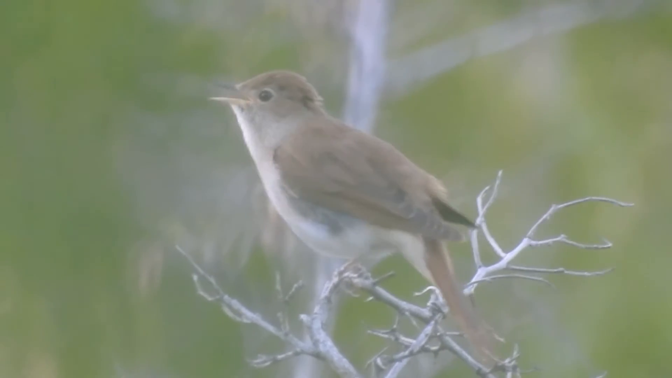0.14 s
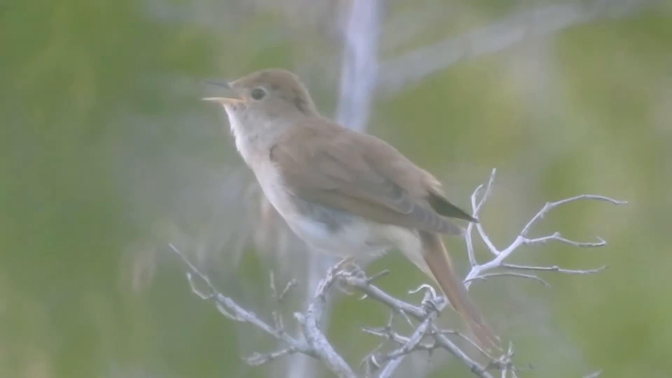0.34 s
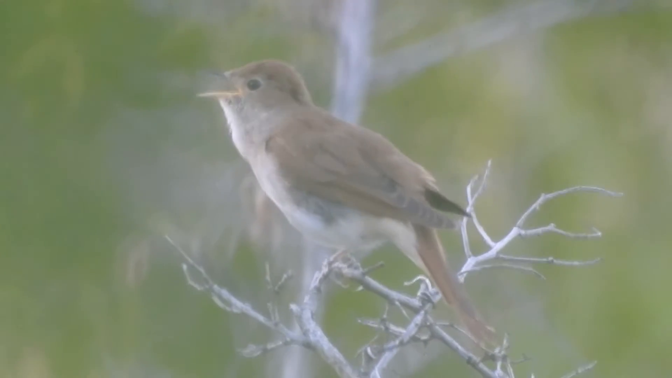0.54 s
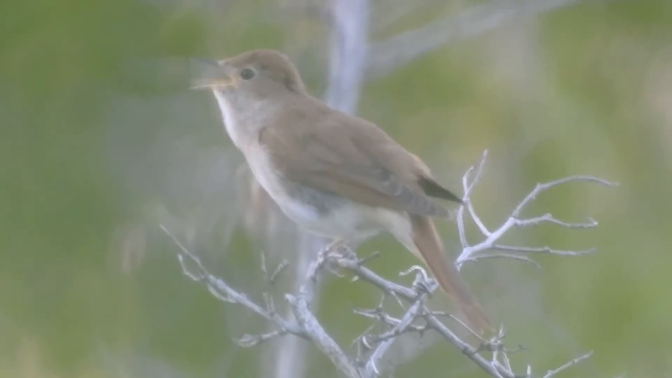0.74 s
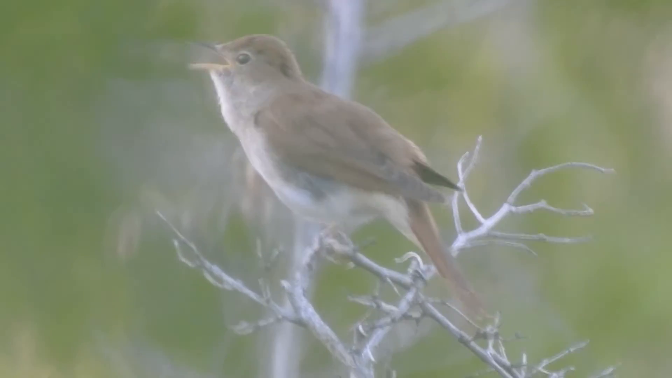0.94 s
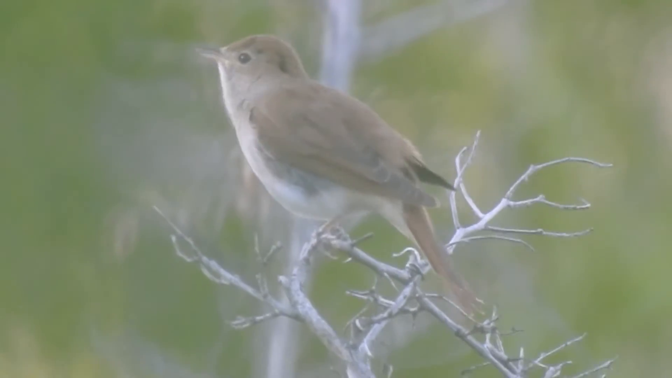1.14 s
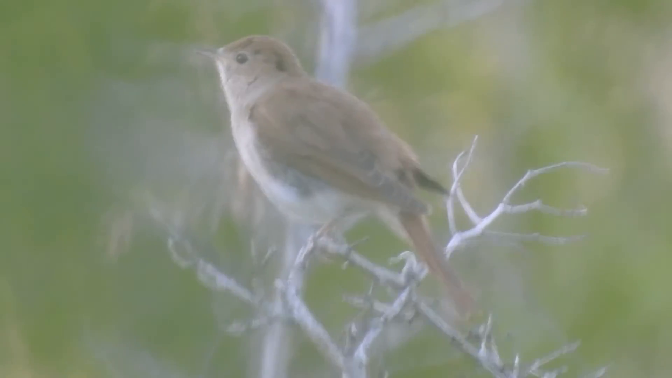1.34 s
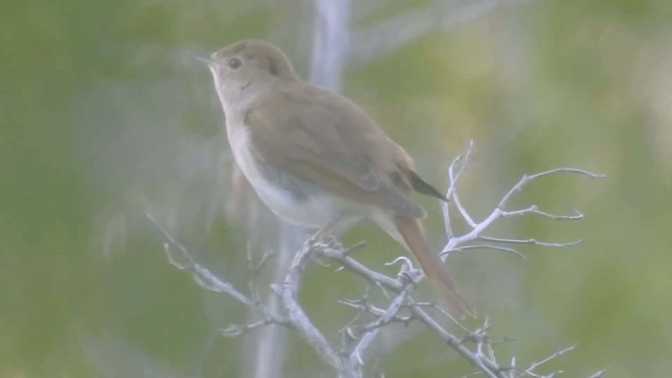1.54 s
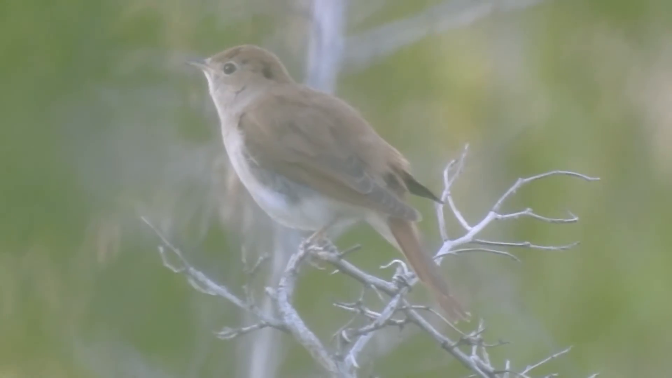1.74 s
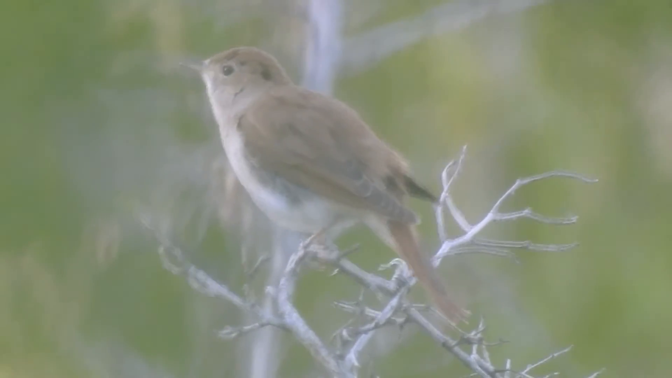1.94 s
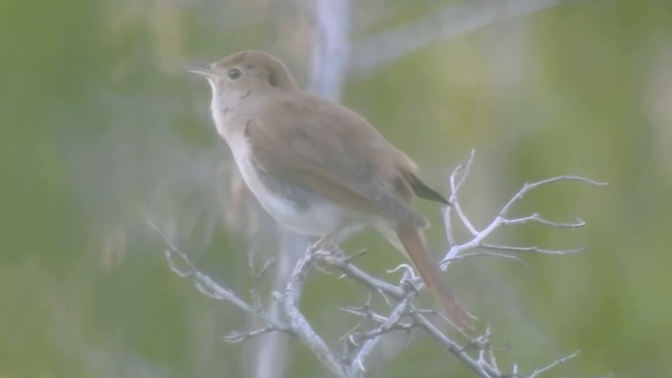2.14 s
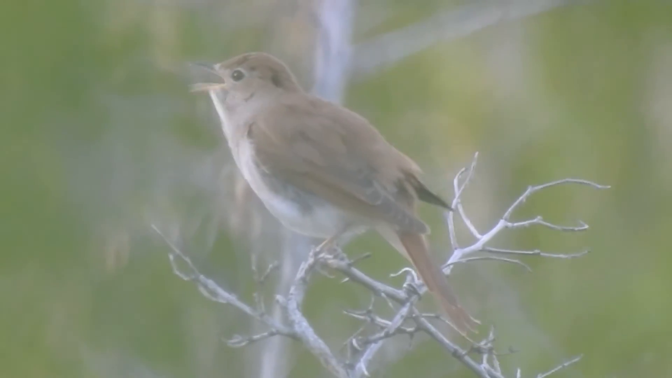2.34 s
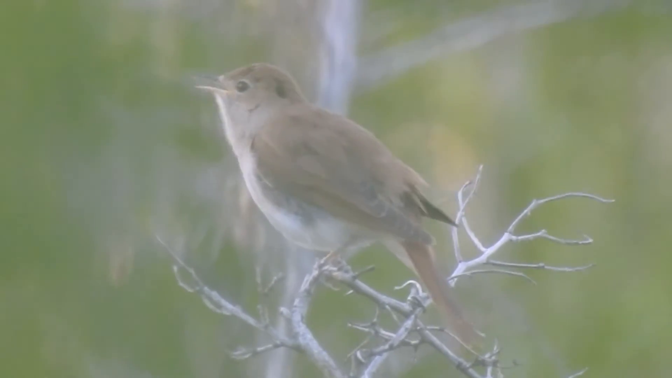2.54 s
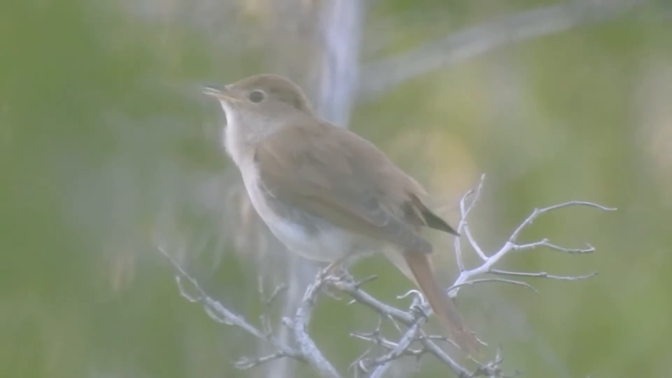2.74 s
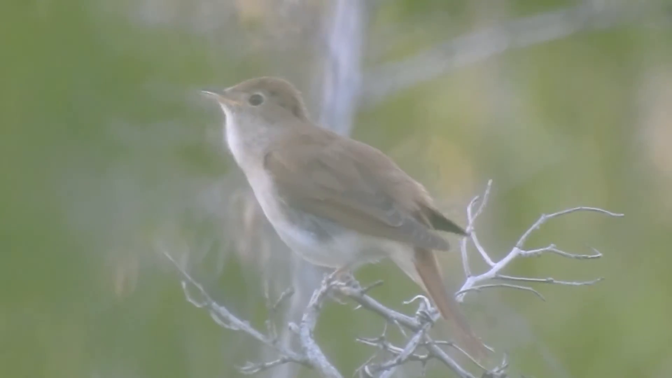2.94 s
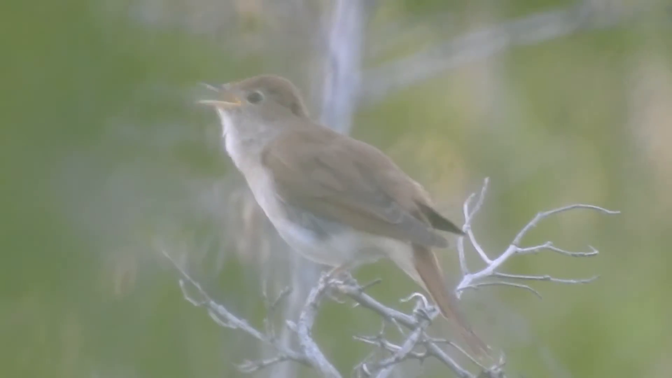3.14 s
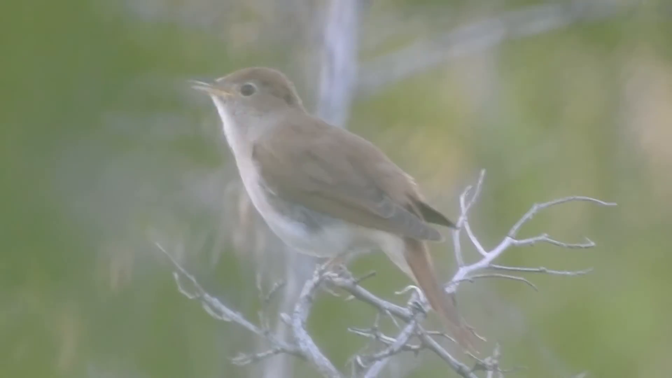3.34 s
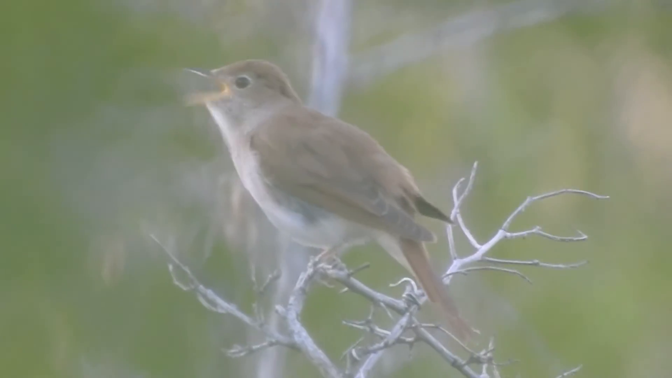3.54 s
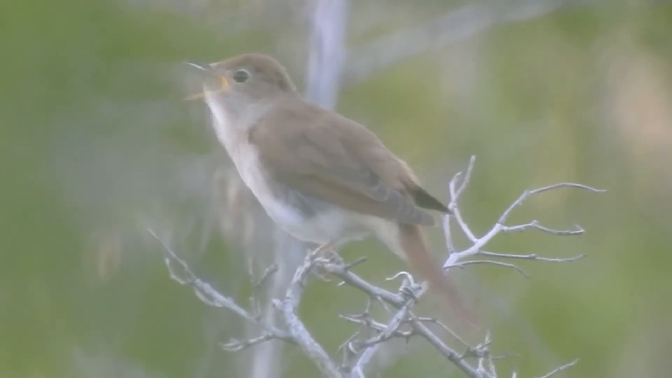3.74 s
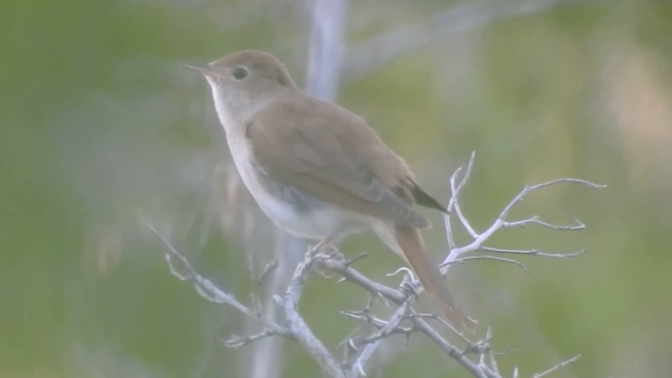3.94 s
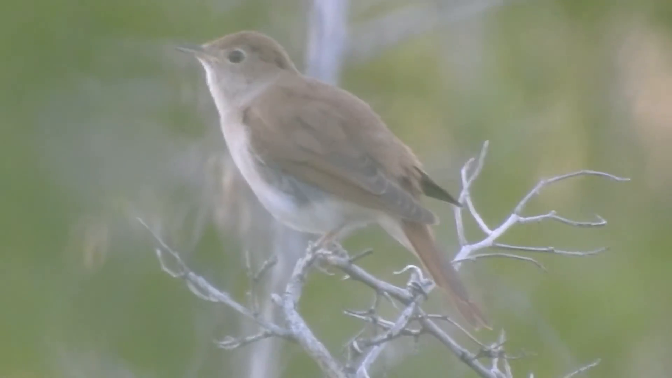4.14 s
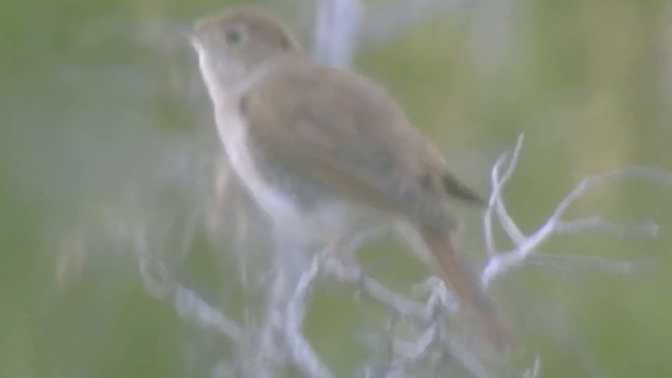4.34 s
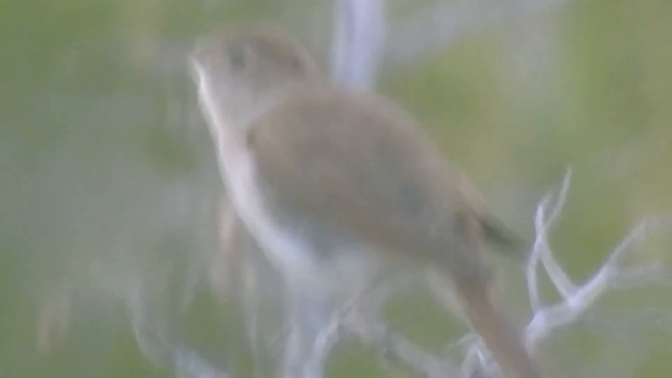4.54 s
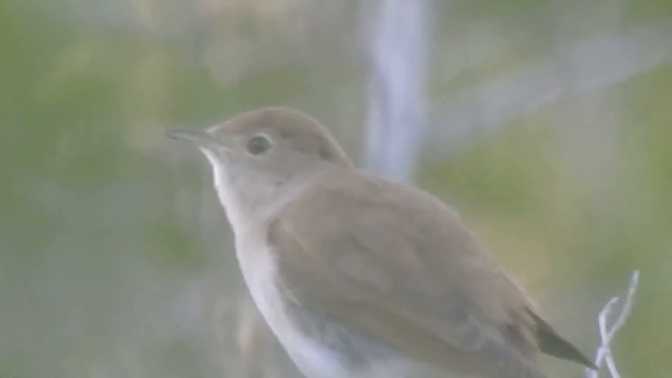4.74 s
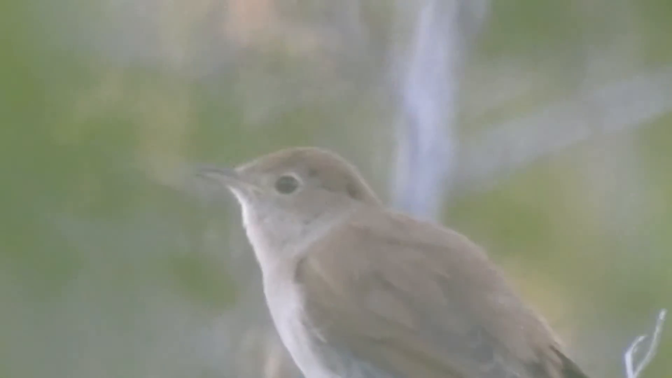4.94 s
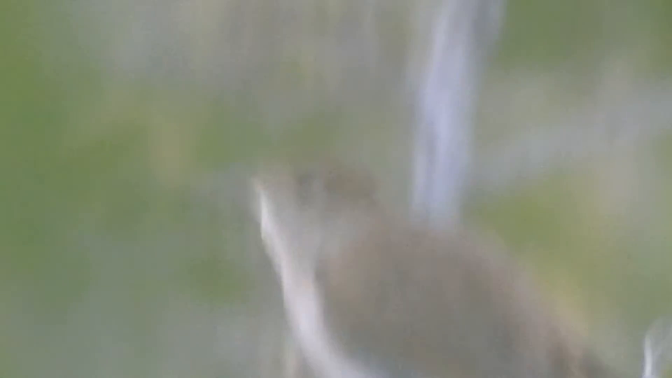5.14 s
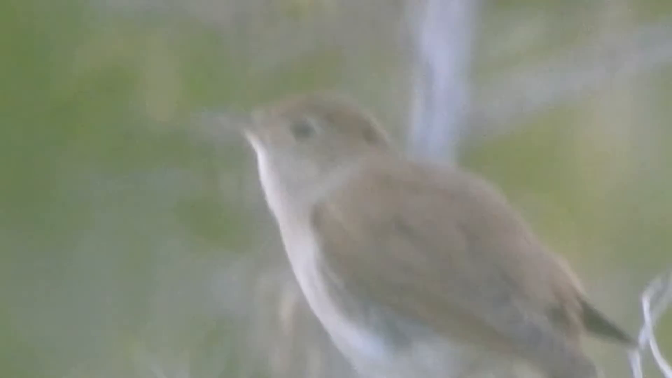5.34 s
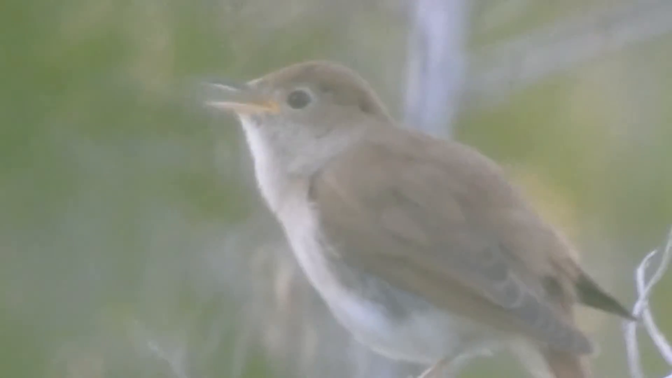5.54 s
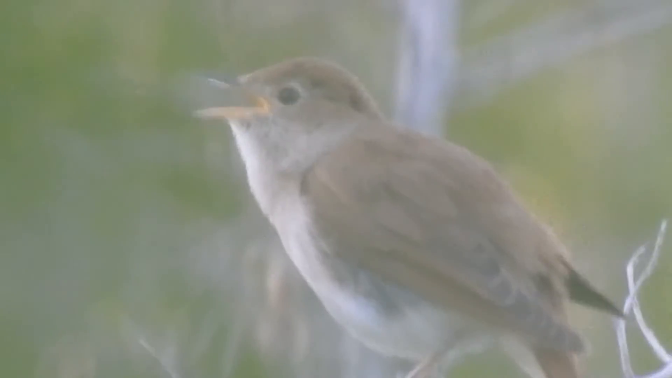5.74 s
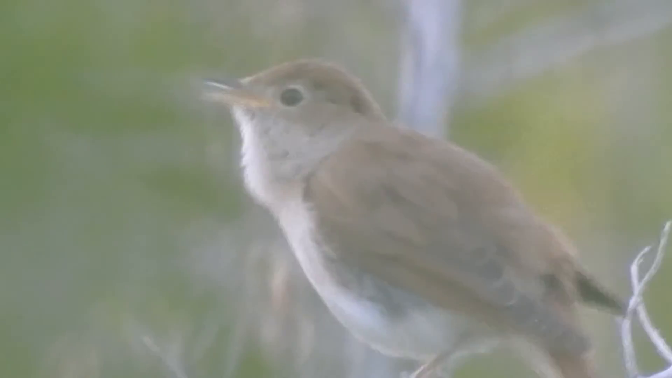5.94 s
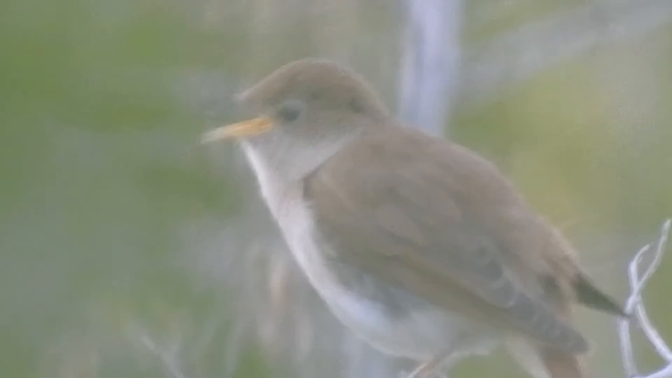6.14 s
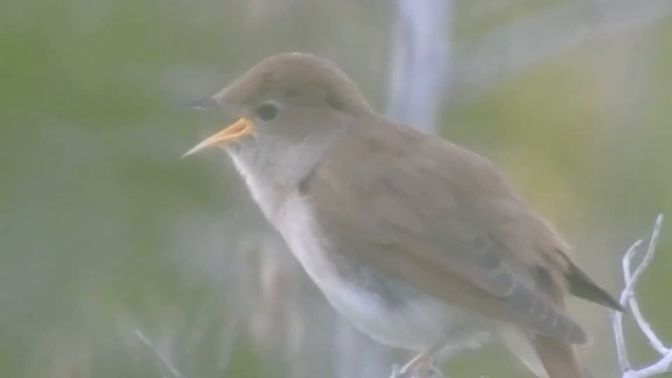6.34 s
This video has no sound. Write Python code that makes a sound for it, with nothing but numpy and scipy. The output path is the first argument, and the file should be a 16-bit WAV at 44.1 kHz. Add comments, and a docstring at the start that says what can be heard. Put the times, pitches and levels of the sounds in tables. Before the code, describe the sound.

A nightingale close by sings rapid clicks, whip-like cracks, short trills and gliding chirps outdoors, with crickets pulsing and fainter birds answering farther off.

```python
"""Among bushes, outdoors: a nightingale sings a few metres off in clicks, whips, trills and gliding whistles.
Its voice, and that of the other birds farther away, is a nearly pure tone steered in pitch and level.
Crickets to the right are pulsed falling tones; clicks are resonant noise bursts.
Shaped noise makes the soft rumble and leaf hiss, and decaying noise the short, scattered echo of the bushes."""
import sys
import numpy as np
from scipy import signal
from scipy.fft import rfft, irfft, next_fast_len
from scipy.io import wavfile
from scipy.ndimage import uniform_filter1d, map_coordinates

SR = 44100
rng = np.random.default_rng(int(sys.argv[2]) if len(sys.argv) > 2 else 0)


def persist_wave(psi):
    """Save psi, clipped to +-1, as 16-bit WAV."""
    counts = np.round(np.clip(psi, -1, 1) * 32767).astype(np.int16)
    wavfile.write(sys.argv[1], SR, np.atleast_2d(counts).T)


def ratio_of_db(decibels):
    """Turn decibels (scalar or array-like) into linear amplitude factors; 0 dB maps to 1."""
    return 10 ** (np.asarray(decibels, float) / 20)


N = 285768  # samples in the scene


def unit(x):
    """Normalisation: a signal divided by its root mean square has rms 1."""
    return x / np.sqrt(np.mean(x ** 2) + 1e-20)


def along(points, hz):
    """Logarithmic interpolation: (f/Hz, value) points joined on a log frequency axis."""
    f, v = np.transpose(points)
    return np.interp(np.log(hz + 1), np.log(f + 1), v)


def wobble(size, rate):
    """Band-limited fluctuation: a smooth curve through random knots, rate of them a second."""
    knots = rng.standard_normal(int(size * rate / SR) + 4)
    return map_coordinates(knots, [np.arange(size) * rate / SR])


def filtered(x, response):
    """Linear filtering: the spectrum times a complex response of frequency."""
    m = next_fast_len(x.shape[-1] + 8192)
    spectrum = rfft(x, m) * response(np.fft.rfftfreq(m, 1 / SR))
    return irfft(spectrum, m)[..., :x.shape[-1]]


def add(track, s, sound):
    """Superposition: a sound is summed into a track from time s."""
    part = track[round(s * SR):][:len(sound)]
    part += sound[:len(part)]


TRAIL = int(.01 * SR)  # samples by which the overtones lag the fundamental


def syrinx(hz, gain):
    """Filtered vibration: beak and throat leave faint overtones, and the membrane shivers a little."""
    brief = 1 / (1 + len(hz) / SR / 0.46)  # held whistles are steadier than quick notes
    shivering_hz = hz * (1 + 0.0081 * brief * wobble(len(hz), 290.5))
    phase = 2 * np.pi * (np.cumsum(shivering_hz) / SR + rng.random())
    overtones = ratio_of_db(-18.5) * np.sin(2 * phase) + ratio_of_db(-37.0) * np.sin(3 * phase)
    # overtones pass best where the open beak favours them: fundamentals near 3100 Hz
    fits = .015 + np.exp(-((hz - 3100) / 500) ** 2)
    size = gain * ratio_of_db(2.0 * brief * wobble(len(hz), 140.0))
    fundamental = np.pad(size * np.sin(phase), (0, TRAIL))
    return fundamental + np.pad(size * brief * fits * overtones, (TRAIL, 0))


def note(ms, first_hz, mid_hz, last_hz, db, swell, lean=0.78):
    """Frequency modulation: a parabola of pitch under one arch of level; lean below 1 peaks it early."""
    u = np.linspace(0, 1, int(ms * SR / 1000) + 2)
    bend = np.polyfit([0, .5, 1], [first_hz, mid_hz, last_hz], deg=2)
    return syrinx(np.polyval(bend, u), ratio_of_db(db) * np.abs(np.sin(np.pi * u ** lean)) ** swell)


def glide(rows, soften_ms):
    """Portamento: a (t/s, f/Hz, level/dB) contour with its pitch corners rounded and its ends faded."""
    s, hz, db = np.transpose(rows)
    t = np.arange(s[0], s[-1], 1 / SR)
    width = int(soften_ms * SR / 1000) + 1
    pitch = uniform_filter1d(np.interp(t, s, hz), width, mode="nearest")
    ends = np.clip(np.minimum(t - s[0], s[-1] - t) / 0.0012, 0, 1)  # 1.2 ms fades
    return syrinx(pitch, ends * np.interp(t, s, ratio_of_db(db)))


def bird(notes, glides, swell, soften_ms):
    """Superposition: short notes and long contours make up one song."""
    song = np.zeros(N)
    for s, *shape in notes:
        add(song, s, note(*shape, swell))
    for rows in glides:
        add(song, rows[0][0], glide(rows, soften_ms))
    return song


def bowed(rows):
    """Curved frequency sweep: pitch bows above the straight line, so rises ease off and falls speed up."""
    bow = 0.169  # share of the slide's span
    return [(s, ms, a, (a + b) / 2 + bow * abs(b - a), b, db) for s, ms, a, b, db in rows]


# relative spectral density of the air: f/Hz, level/dB per Hz
AIR_SPECTRUM = [(25, -32), (45, -3.5), (70, 4), (130, -4.5), (200, 0.5), (520, -9), (650, -5), (730, -11.5),
                (1700, -16), (3600, -17.5), (6300, -15), (8100, -28), (14000, -38.5), (15600, -45)]
# correlation of left and right in the air: f/Hz, likeness (0 to 1)
AIR_LIKENESS = [(60, 0.82), (950, 0.92), (3770, 0.47), (15000, 0.062)]


def air():
    """Shaped noise with partial coherence: distant rumble and leaf hiss with faint patches."""
    z = signal.stft(rng.standard_normal((2, N)), nperseg=512)[2]
    field = uniform_filter1d(rng.standard_normal(z.shape[1:]), size=6, axis=0)
    patches = unit(uniform_filter1d(field, size=14, axis=1))
    leafy = np.clip(np.arange(len(field))[:, None] / 20, 0, 1)  # the rumble stays even, the leaves rustle
    pair = signal.istft(z * ratio_of_db(2.37 * leafy * patches), nperseg=512)[1][:, :N]

    def mid_side(hz):
        angle = np.arccos(np.clip(along(AIR_LIKENESS, hz), -1, 1)) / 2
        return ratio_of_db(along(AIR_SPECTRUM, hz)) * [np.cos(angle), np.sin(angle)]

    mid, side = filtered(pair, mid_side)
    return ratio_of_db(-44.5) * unit(np.array([mid + side, mid - side])) * ratio_of_db([[-.9], [.9]])


# level of the farther crickets together: t/s, level/dB (rms)
CHORUS_LEVEL = [(0, -50), (1.4, -51.5), (2, -49), (2.25, -59.5), (3.3, -51.5), (4.7, -58.5), (6.48, -56.5)]


def crickets(count=10):
    """Stridulation: wing strokes are falling tones of some 22 ms; each insect has its own pace and pitch."""
    s, db = np.transpose(CHORUS_LEVEL)
    out = np.zeros((2, N))
    for k in range(count):
        cycle = (np.cumsum(19 + .4 * k + 1.4 * wobble(N, 3)) / SR + rng.random()) % 1
        stroke = np.clip(cycle / .45, 0, 1)
        hz = 4900 - 52 * k + 60 * wobble(N, 2.6) - 330 * stroke ** 2
        size = np.sin(np.pi * stroke) * ratio_of_db(4.4 * wobble(N, 5.03))
        tone = size * np.sin(2 * np.pi * np.cumsum(hz) / SR)
        out += [tone, ratio_of_db(5.0) * np.roll(tone, -1 - k % 3)]  # the right channel leads by 1 to 3 samples
    return unit(out) * ratio_of_db(np.interp(np.arange(N) / SR, s, db))


# reverberation time of the bushes: f/Hz, T60/s
BUSH_DECAY = [(1500, 0.62), (4000, 0.56), (8000, 0.35)]


def bushes(x, alike):
    """Diffuse reflection: decaying noise; a clump some 9 m away throws one stronger echo, 50 ms late."""
    hz, t, z = signal.stft(rng.standard_normal((3, SR // 2)), SR, nperseg=128)
    decay = ratio_of_db(-60 * t / along(BUSH_DECAY, hz)[:, None])
    common, *own = signal.istft(z * decay, SR, nperseg=128)[1]
    share = np.clip(alike, 0, 1)  # of the power common to both channels
    tail = np.sqrt(share) * common + np.sqrt(1 - share) * np.array(own)
    tail = tail / np.linalg.norm(tail[0])
    tail[:, SR // 20:][:, :SR // 200] += 0.029 * rng.standard_normal(SR // 200)  # the clump, 5 ms long
    return signal.fftconvolve(x[None], tail, axes=1)[:, :N]


# dry ticks of beak and twigs: t/s, level/dB (peak), centre f/Hz, time for the burst to fall 14 dB/ms
TICKS_HEARD = [(0.044, -22, 5460, 5.7), (0.0706, -17, 6200, 1.9), (.094, -16.5, 6140, 3.6),
               (0.121, -17, 6130, 4.4), (1.717, -31, 5400, 1.9), (3.806, -22.5, 5300, 2.3),
               (4.623, -32, 1040, 13), (4.635, -29, 5560, 6), (5.1, -34.5, 950, 9.7)]


def ticks(width):
    """Resonance: noise bursts of a few milliseconds are coloured by one broad peak, width over centre."""
    out, t = np.zeros(N), np.arange(SR // 20) / SR
    for s, db, hz, ms in TICKS_HEARD:

        def response(f):
            damping = 1j * f * width * hz
            peak = damping / (hz * hz - f * f + damping)
            return peak ** 3 / (1 + 1j * f / 8000) ** 6  # little gets out above 8 kHz

        burst = rng.standard_normal(len(t)) * ratio_of_db(-14 * t * 1000 / ms)
        ring = filtered(burst, response)
        add(out, s, ratio_of_db(db) * ring / np.abs(ring).max())
    return out


# two near crickets: strokes a chirp, gap/ms, first f/Hz, fall in f/Hz
NEAR_CRICKETS = [(4, 47, 4820, 420), (3, 45, 4440, 120)]
# chirps, one list a cricket: t/s of the last stroke, level/dB of that stroke before panning
CHIRP_TIMES = [
    [(.47, -41), (.96, -40), (1.46, -41.5), (1.98, -40.5), (2.43, -37), (2.93, -37.5), (3.49, -39),
     (3.96, -37), (4.42, -41), (4.93, -38.5), (5.32, -41), (6.4, -42)],
    [(.17, -34), (.68, -40), (1.4, -37), (2.07, -39.5), (2.56, -38.5), (3.81, -40), (4.25, -39.5),
     (5.0, -42.5), (5.53, -40.5)],
]


def chirps():
    """Stridulation: a chirp is a few falling wing strokes that tend to swell; the right channel leads."""
    stroke_ms, swell_db = 21.4, 2.5  # swell from one stroke to the next
    song, u = np.zeros(N), np.linspace(0, 1, int(stroke_ms * SR / 1000))
    for (strokes, gap_ms, hz, fall_hz), rows in zip(NEAR_CRICKETS, CHIRP_TIMES):
        for s, db in rows:
            for k in range(strokes):  # counted back from the last
                size, detune, turn = rng.standard_normal(3)
                phase = 2 * np.pi * np.cumsum(hz + 30 * detune - fall_hz * u) / SR + 2 * turn
                gain = ratio_of_db(db - swell_db * k + 2.0 * size)
                add(song, s - k * gap_ms / 1000, gain * np.sin(np.pi * u) * np.sin(phase))
    return np.array([ratio_of_db(-3) * song, ratio_of_db(2.0) * np.roll(song, -2)])


# sliding notes: start t/s, length/ms, first f/Hz, last f/Hz, level/dB
NEAR_SLIDES = [(1.217, 22, 6200, 7520, -22.5), (1.217, 44, 5300, 6190, -26), (1.204, 34, 3550, 4100, -41.5),
               (1.228, 42, 4080, 5480, -29), (1.214, 37, 2750, 3170, -38.5), (2.478, 10.4, 3820, 3650, -30),
               (2.486, 9.7, 5700, 3530, -25.5), (3.123, 8.4, 2860, 4220, -29),
               (3.131, 9.8, 3930, 6180, -19.5), (3.139, 8.3, 4220, 4340, -11), (3.41, 23, 3590, 4050, -28),
               (3.415, 11, 5020, 7050, -29), (3.42, 10, 4270, 5640, -26), (3.418, 28, 2914, 1410, -23.5),
               (3.872, 24, 3463, 1388, -21.5), (3.876, 9.7, 3880, 4650, -21.5)]
# arched notes: start t/s, length/ms, top f/Hz, level/dB
NEAR_ARCHES = [(2.903, 56, 1753, -30), (3.008, 65, 1743, -31.5), (0.165, 34, 4520, -29.5)]
# long notes, one contour each: t/s, f/Hz, level/dB
NEAR_CONTOURS = [
    [(0.18, 2350, -33), (0.19, 1985, -23.5), (0.201, 1832, -37), (0.213, 2110, -24), (0.227, 2540, -20.5),
     (0.24, 2710, -18), (0.251, 2765, -23)],
    [(2.395, 4245, -38.5), (2.44, 4680, -41.5), (2.47, 5100, -31), (2.486, 5580, -23.5)],
    [(3.135, 4180, -26), (3.139, 3630, -14.5), (3.144, 2950, -18.5), (3.156, 3270, -20),
     (3.167, 3400, -18.5), (3.178, 3030, -27), (3.193, 2060, -40)],
    [(3.256, 1734, -45), (3.266, 1957, -31.5), (3.271, 1930, -42), (3.276, 2170, -22.5), (3.288, 2306, -27),
     (3.305, 2700, -19.5), (3.316, 2830, -18), (3.328, 2680, -20.5), (3.344, 1750, -33.5)],
    [(3.645, 8550, -42), (3.65, 7980, -31), (3.665, 7160, -21), (3.68, 6650, -18), (3.688, 6300, -37.5)],
    [(3.742, 2320, -34), (3.76, 2510, -24.5), (3.77, 2410, -23.5), (3.775, 1790, -31), (3.784, 1723, -33.5),
     (3.803, 2910, -18.5), (3.812, 3095, -18.5), (3.822, 2990, -31)],
    [(3.981, 3600, -33), (3.987, 6260, -14), (3.992, 7770, -38), (3.998, 8400, -33)],
    [(5.59, 3170, -66), (5.66, 3358, -42), (5.72, 3386, -35), (5.9, 3430, -34), (5.95, 3483, -30.5),
     (5.96, 3420, -38)],
    [(6.2, 3560, -45), (6.23, 3560, -35), (6.3, 3505, -31.5), (6.38, 3445, -28), (6.49, 3567, -27)],
]


def near_notes():
    """Frequency modulation: the near bird's slides, arches and long contours."""
    start, end = .82, 0.722  # pitch at the ends of an arch, over its middle
    arches = [(s, ms, start * hz, hz, end * hz, db) for s, ms, hz, db in NEAR_ARCHES]
    return bird(bowed(NEAR_SLIDES) + arches, NEAR_CONTOURS, swell=0.56, soften_ms=1.5)


# whip-and-trill phrases: crack t/s, crack level/dB, wait before the trill/ms,
# trill first f/Hz, trill level/dB, fade a note/dB
WHIP_TRILLS = [(0.345, -7.5, 31, 3250, -17, 4), (0.5742, -10, 26, 3280, -17.5, 4.5),
               (0.7959, -12, 26, 3400, -16.5, 4.5), (1.0199, -10.5, 22.4, 3010, -24, 1.4)]
# the whip, as contours around its loudest moment: t/s from the crack, f/Hz, level/dB re crack
WHIP_CONTOURS = [
    [(-.010, 4200, -30), (-.0075, 3750, -11.5), (-.005, 3150, -12)],
    [(-.004, 7400, -42), (-.002, 6600, -11), (0, 5700, -1), (.002, 4700, -8), (.005, 3700, -15)],
    [(-.016, 13000, -62), (-.01, 13700, -43), (-.006, 13100, -31), (-.002, 11000, -30.5), (.002, 8000, -30)],
]
# the low hook under each crack: t/s from the crack, f/Hz, level/dB
WHIP_HOOK = [(0, 2800, -28), (.004, 2400, -26), (.011, 2370, -26.5), (.02, 2600, -36)]


def whips():
    """Two-voice phonation: a blip, steep loud fall and thin high arc; a low hook from the other syrinx half."""
    song = np.zeros(N)
    for s, db, *_ in WHIP_TRILLS:
        add(song, s, glide(WHIP_HOOK, soften_ms=1.63))
        for part in WHIP_CONTOURS:
            add(song, s + part[0][0], ratio_of_db(db) * glide(part, soften_ms=1.2))
    return song


# successive notes of every trill: length/ms
TRILL_LENGTHS = [14, 19, 24, 17.3]


def trills():
    """Exponential relaxation: notes open sharply, sag toward one low pitch, and fade one after another."""
    gap_ms, sag_ms, low_hz = 26.5, 8.36, 2192  # sag: time constant of the fall
    scatter, scatter_db = 0.029, 0.5  # scatter: share of the first pitch
    song = np.zeros(N)
    for s, _, wait_ms, hz, db, fade_db in WHIP_TRILLS:
        for k, ms in enumerate(TRILL_LENGTHS):
            u = np.linspace(0, 1, int(ms * SR / 1000))
            first_hz = hz * (1 + scatter * rng.uniform(-0.87, 1))
            pitch = low_hz + (first_hz - low_hz) * np.exp(-u * ms / sag_ms)
            size = ratio_of_db(db - fade_db * k + scatter_db * rng.standard_normal())
            envelope = np.abs(np.sin(np.pi * u ** 0.61)) ** 0.7
            add(song, s + (wait_ms + k * gap_ms) / 1000, syrinx(pitch, size * envelope))
    return song


# thin sliding whistles: start t/s, length/ms, first f/Hz, last f/Hz, level/dB
FAR_WHISTLES = [(0.675, 120, 6870, 6450, -43.5), (0.945, 72, 7340, 6280, -46.5),
                (3.404, 120, 7300, 6400, -46.5), (5.64, 210, 5120, 4845, -49),
                (5.89, 100, 2720, 2360, -41.5), (6.391, 90, 3100, 3120, -53), (5.7, 72, 2310, 2020, -48),
                (5.77, 150, 7030, 6140, -49), (5.915, 26, 5380, 4490, -41), (6.08, 35.6, 4620, 5040, -40.5),
                (6.14, 26, 6120, 6840, -42.5), (2.23, 150, 3123, 3066, -51.5), (6.25, 79, 1695, 1780, -52),
                (6.315, 33, 5000, 5330, -42.5)]
# falls that speed up: start t/s, length/ms, first f/Hz, last f/Hz, level/dB
FAR_FALLS = [(6.18, 46, 6640, 5730, -40), (6.342, 30, 5130, 4560, -39.5)]
# long notes, one contour each: t/s, f/Hz, level/dB
FAR_CONTOURS = [
    [(4.87, 2086, -65), (4.92, 2090, -39), (4.96, 2243, -35.5), (5.01, 2316, -37), (5.06, 2090, -38.5),
     (5.1, 1983, -45), (5.2, 2000, -68)],
    [(5.22, 2865, -44), (5.25, 2850, -44), (5.275, 2100, -42.5), (5.31, 1636, -45.5)],
    [(5.38, 2095, -46), (5.43, 2010, -39), (5.48, 2023, -34), (5.53, 2086, -41), (5.58, 2140, -64)],
]


def far_notes():
    """Frequency modulation: far birds' falls and contours, and thin whistles whose slide slows down."""
    early = 0.64  # share of the slide done by half time
    slides = [(s, ms, a, a + early * (b - a), b, db) for s, ms, a, b, db in FAR_WHISTLES]
    return bird(slides + bowed(FAR_FALLS), FAR_CONTOURS, swell=0.12, soften_ms=20)


# the chanted phrase: t/s from the top note, length/ms, first f/Hz, middle f/Hz, last f/Hz, level/dB before gain
CHANT_PHRASE = [(-0.083, 36, 1713, 1534, 1320, -45), (-0.018, 27, 2080, 2104, 2420, -36),
                (0, 27, 2594, 2640, 2600, -37.5), (0.012, 22, 2524, 2120, 1540, -36)]


def chant(count=4):
    """Random amplitude modulation: a far bird repeats a grainy four-note phrase, never equally loud."""
    start_s, gap_s, gain_db = 2.224, .1677, -2
    song = np.zeros(N)
    for k in range(count):
        for lead, *shape in CHANT_PHRASE:
            tone = note(*shape, swell=0.35)
            grain_db = 3 * wobble(len(tone), 130)
            level_db = gain_db + 1.0 * rng.standard_normal() + grain_db
            add(song, start_s + k * gap_s + lead, ratio_of_db(level_db) * tone)
    return song


def warble():
    """Joint frequency and amplitude modulation: a high warble, loudest at the bottom of each pitch swing."""
    start_s, swing_ms, swings = 2.752, 41.2, 2.3
    centre_hz, depth_hz, peak_db, dip_db, edge_db = 7185, 456, -15, 15, 15
    turn = np.arange(int(swings * swing_ms * SR / 1000)) / SR * 1000 / swing_ms
    high = np.cos(2 * np.pi * turn)
    edge = (2 * turn / swings - 1) ** 4  # the swings start and end faint
    level_db = peak_db - dip_db * np.abs(np.cos(np.pi * turn)) - edge_db * edge
    song = np.zeros(N)
    add(song, start_s, syrinx(centre_hz + depth_hz * (high + 0.54 * edge), ratio_of_db(level_db)))
    return song


def duets(count=4):
    """Two-voice phonation: both syrinx halves chirp down at once; the first upper chirp dips lowest."""
    start_s, gap_ms, high_db, low_db, fade_step_db = 3.524, 21, -21, -24, 2.5
    song = np.zeros(N)
    for k in range(count):
        s, fade_db = start_s + k * gap_ms / 1000, fade_step_db * k
        dip_hz = 550 * (k == 0)
        add(song, s, note(15, 8800, 7800 - dip_hz, 7450 - dip_hz, high_db - fade_db, swell=1.0, lean=1.37))
        add(song, s, note(15.0, 6350, 5600, 5300, low_db - fade_db, swell=0.71))
    return song


# strands of the rasp: side-band number, level/dB (peak)
RASP_STRANDS = [(-4, -36), (-1, -25), (0, -20.5), (1, -29), (2, -36)]


def rasp():
    """Side-bands: a rising tone as if chopped 640 to 920 times a second, a comb that steepens at the end."""
    u = np.linspace(0, 1, int(.032 * SR))
    rise = 1 + 0.132 * u + 0.303 * u ** 4.67
    envelope = np.sin(np.pi * u ** 2.0) ** 0.37
    strands = [syrinx((5300 + 640 * k) * rise, ratio_of_db(db) * envelope) for k, db in RASP_STRANDS]
    song = np.zeros(N)
    add(song, 3.952, sum(strands))
    return song


# fast far trills, one contour each: t/s, f/Hz, level/dB
FAR_TRILLS = [
    [(5.725, 2780, -41), (5.89, 2540, -50.5)],
    [(5.74, 2430, -48), (5.85, 2315, -33), (5.9, 2430, -48)],
    [(6.34, 1980, -42.5), (6.465, 2030, -39.5)],
]


def churrs():
    """Pulse modulation: far trills in wavering strands of uneven pulses whose pitch saws down."""
    song = np.zeros(N)
    for rows in FAR_TRILLS * 2:  # two strands to a contour
        s, hz, db = np.transpose(rows)
        t = np.arange(s[0], s[-1], 1 / SR)
        pulse_hz = 40 + 8 * wobble(len(t), 30.9)
        cycle = (np.cumsum(pulse_hz) / SR + rng.random()) % 1
        pitch = np.interp(t, s, hz) * (1 + 0.12 * (.5 - cycle) + 0.0249 * wobble(len(t), 40))
        size = ratio_of_db(np.interp(t, s, db) + 2.2 * wobble(len(t), 53))
        add(song, s[0], syrinx(pitch, size * np.sin(np.pi * cycle) ** 2))
    return song


def scene():
    """Direct-to-reverberant ratio: the far birds carry more echo than the near one."""
    near = near_notes() + warble() + whips() + trills() + duets() + rasp() + ticks(width=0.48)
    throb_hz = 40 + 5 * wobble(N, 8.8)
    throb = ratio_of_db(2.9 * np.sin(2 * np.pi * np.cumsum(throb_hz) / SR))  # far whistles throb on the way
    far = far_notes() * throb + chant() + churrs()
    near = (near + ratio_of_db(-13.5) * bushes(near, alike=0.76)) * ratio_of_db([[-.6], [.6]])
    far = (ratio_of_db(1.0) * far + ratio_of_db(-3.5) * bushes(far, alike=1.0)) * ratio_of_db([[-1.5], [1.5]])
    lag_s = 3.4e-5  # the far birds sit to the right, so the left channel hears them later
    far[0] = filtered(far[0], lambda hz: np.exp(-2j * np.pi * hz * lag_s))
    chorus = crickets() + chirps()
    return near + far + chorus + ratio_of_db(-2.0) * bushes(chorus[0], alike=0.12) + air()


def roll_off(x):
    """The treble ends steeply here."""
    return signal.sosfilt(signal.butter(12, 15670, fs=SR, output="sos"), x)


def record(dry):
    """Low-pass filtering: the finished mix loses its top above some 15.7 kHz, where the recorder's treble ends."""
    return roll_off(dry)


dry = scene()
out = record(dry)
persist_wave(out)
```